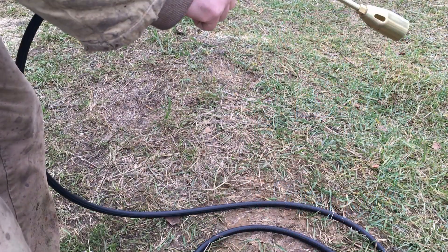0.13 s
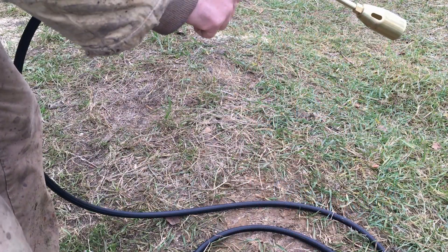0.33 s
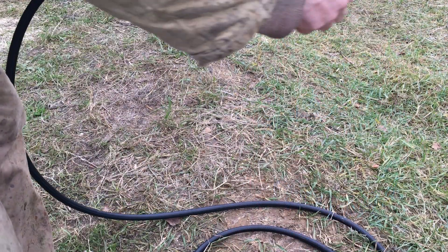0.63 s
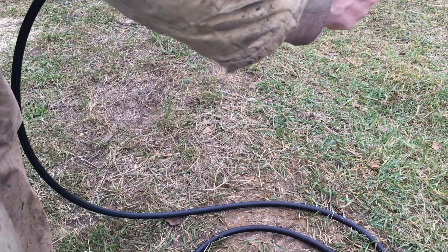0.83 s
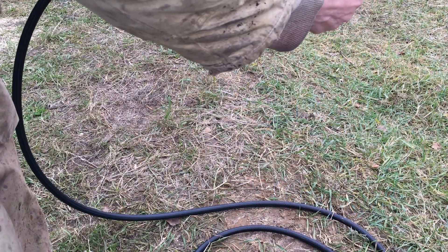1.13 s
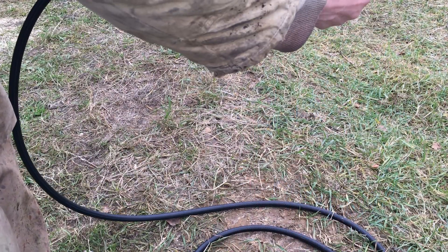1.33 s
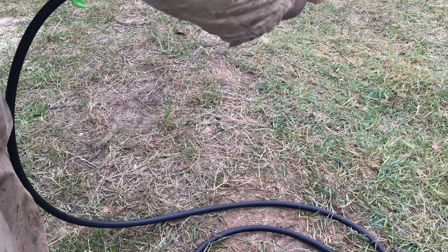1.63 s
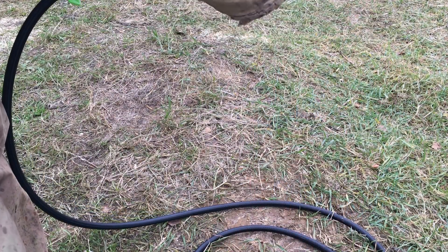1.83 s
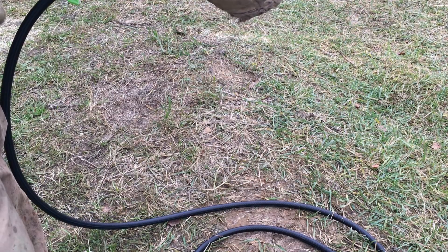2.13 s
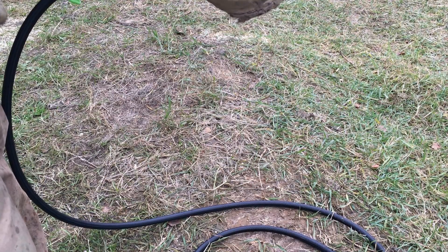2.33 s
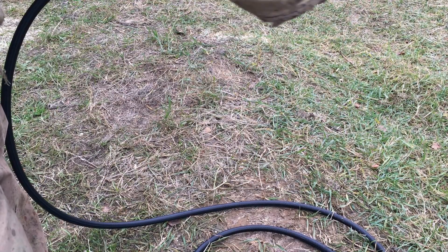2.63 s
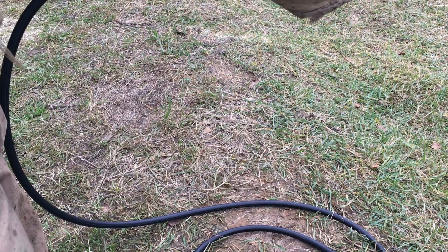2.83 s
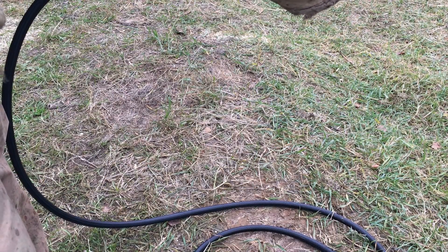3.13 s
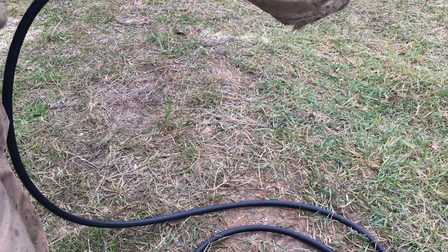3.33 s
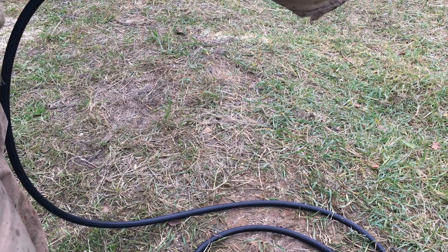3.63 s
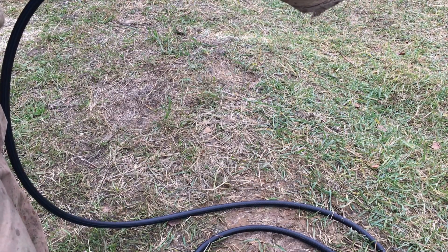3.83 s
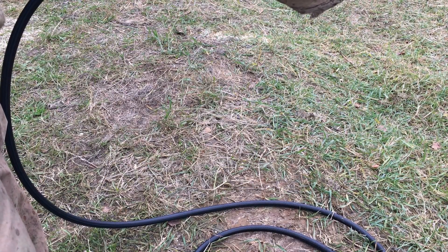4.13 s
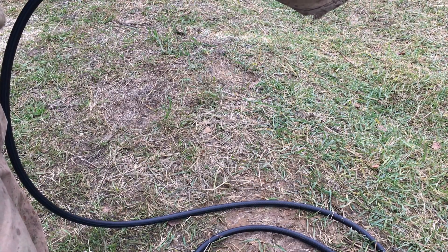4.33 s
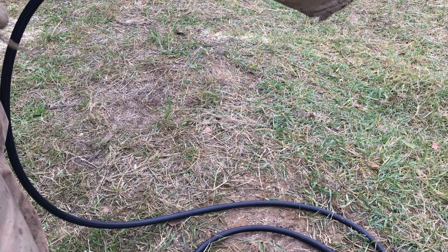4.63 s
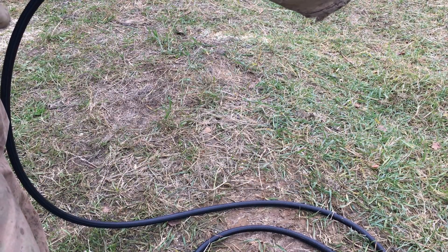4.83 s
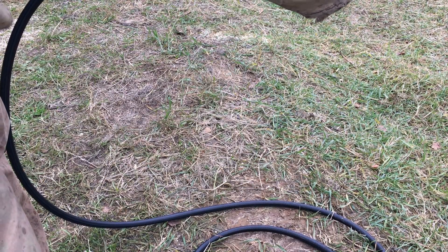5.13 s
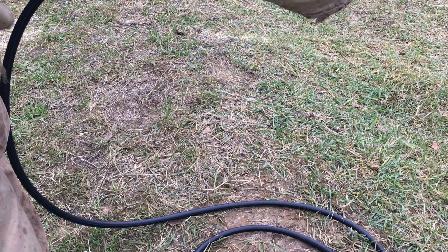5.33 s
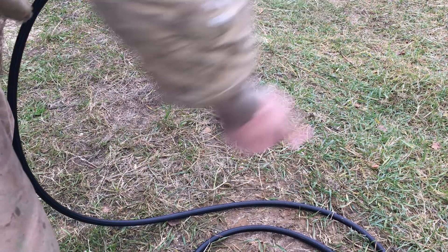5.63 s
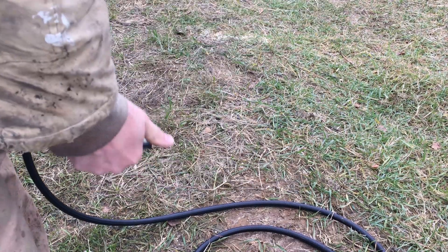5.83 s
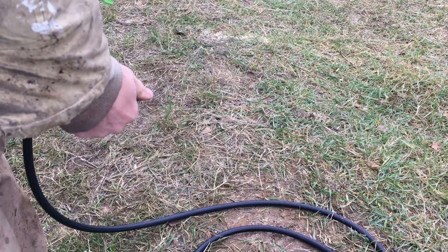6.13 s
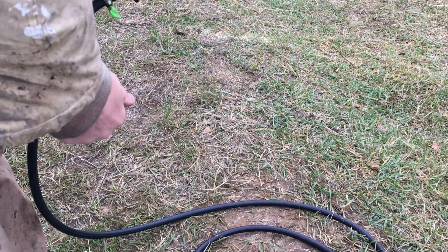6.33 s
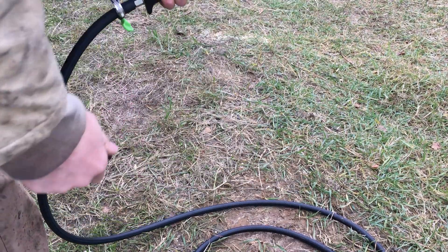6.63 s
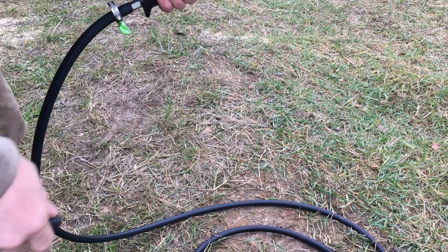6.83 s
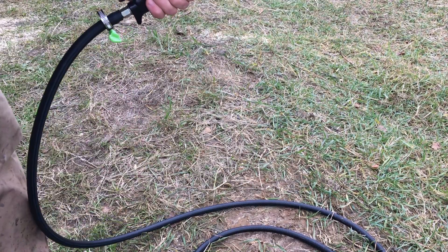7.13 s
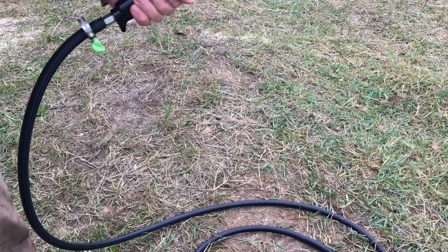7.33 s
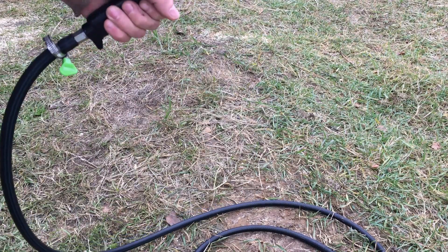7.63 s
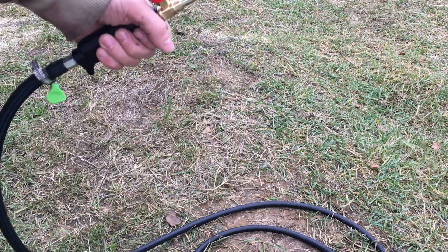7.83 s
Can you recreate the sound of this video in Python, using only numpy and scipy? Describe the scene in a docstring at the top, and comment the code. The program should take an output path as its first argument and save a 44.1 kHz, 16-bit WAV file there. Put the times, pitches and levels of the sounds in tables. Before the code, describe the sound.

Outdoors on a lawn, unlit gas hisses softly through a propane torch close to the microphone while gusts of wind rumble and bump against it. The igniter snaps sharply four times, with lighter ticks as the button springs back. On the fourth snap the gas catches with a low thump, and the flame burns with a loud, fluttering roar. Near the end a small metal fitting clinks once.

```python
"""On a lawn, a propane weed torch is lit close by.
Gas hisses through the burner tube and wind buffets the microphone while the piezo igniter snaps
four times. The fourth spark catches with a thump. The flame roars, coloured by its moving echo
off the ground, and a metal fitting clinks once."""
import sys
import numpy as np
from scipy import signal
from scipy.fft import rfft, irfft
from scipy.io import wavfile
from scipy.ndimage import uniform_filter1d, map_coordinates

SR = 44100
rng = np.random.default_rng(int(sys.argv[2]) if len(sys.argv) > 2 else 0)


def unload_audio(sound):
    """Save the sound as a 16-bit wav file, at the path given as the first command line argument."""
    columns = np.transpose(np.atleast_2d(sound))
    # keep every value between -1 and 1, then stretch to whole-number steps
    steps = np.round(np.clip(columns, -1, 1) * 32767)
    wavfile.write(sys.argv[1], SR, steps.astype(np.int16))


N = 352743
T = np.arange(N) / SR
LIGHT_S = 5.501  # the gas catches fire


# How the flame swells and sinks, before its gains: t/s, rumble level/dB, roar level/dB
FLAME_LEVELS = [(5.56, -25, -36.5), (5.67, -25, -35.5), (5.74, -24.5, -29.5), (6.38, -25, -33.5),
                (6.46, -25, -31.5), (6.79, -23.5, -35.5), (6.9, -25.5, -32), (8.0, -22.5, -31)]
# Tone colours of the flame's low rumble, middle roar and high hiss: f/Hz, level/dB
RUMBLE_COLOUR = [(20, -52), (45, -12), (70, 2), (110, 3), (170, 5), (260, 0.5), (380, -4), (500, -7.5),
                 (700, -7.5), (1050, -9), (1400, -15), (2200, -42), (5000, -38)]
ROAR_COLOUR = [(300, -13.5), (900, 1), (1400, 0.5), (2000, 1.5), (2600, 0.5), (3150, 0.5), (3450, -8),
               (4200, -8.5), (4700, -12), (5300, -18), (8000, -23.5), (16000, -34)]
HISS_COLOUR = [(2000, -9), (5000, -7.5), (6400, -1.5), (7700, -2.5), (10200, -2.5), (12000, 0), (14200, 2),
               (16000, -4)]
# Pitches at which the hot burner rings: f/Hz, width/Hz, boost/dB
BURNER_RESONANCES = [(990, 150, 0), (2810, 110, 4), (4600, 240, 7), (8700, 430, 6), (12150, 600, 3.5)]

def flame(rumble_gain_db=1.73, roar_gain_db=1.67, hiss_mean_db=-40):
    """Swirling gas burns: a rumble, a roar and a hiss that swells with it, all sharing one flutter."""
    rumble_db, roar_db = curves(FLAME_LEVELS)
    hiss_db = hiss_mean_db + 0.55 * (roar_db - np.mean(roar_db[T > LIGHT_S]))
    flutter = wander(260)
    rumble = noise(RUMBLE_COLOUR, BURNER_RESONANCES)
    rumble *= amp(rumble_db + rumble_gain_db + flutter + 0.23 * wander(30))
    rumble = band(rumble, 44, 5700, order=3)
    roar = noise(ROAR_COLOUR, BURNER_RESONANCES)
    roar *= amp(roar_db + roar_gain_db + 0.48 * flutter + 0.77 * wander(40))
    hiss = noise(HISS_COLOUR, BURNER_RESONANCES)
    hiss *= amp(hiss_db + 1.43 * flutter + 0.45 * wander(30))
    lit = np.clip((T - LIGHT_S) / 0.0036, 0, 1)
    return lit * (moving_echoes(rumble, lawn_gain=0.4) + moving_echoes(roar, lawn_gain=0.33) + hiss)


# How late the ground echo comes as the torch is lowered and raised: t/s, delay/ms
GROUND_DELAYS = [(5.6, 3.18), (6.0, 2.9), (6.6, 2.73), (7.55, 3.03), (7.8, 3.48), (8, 3.58)]

def moving_echoes(x, lawn_gain, body_gain=0.1, gain_per_ms=0.21):
    """Echoes off the lawn and the person cancel shifting pitches, more deeply as the torch is raised."""
    lawn_ms, = curves(GROUND_DELAYS)
    lawn_gain = np.clip(lawn_gain + gain_per_ms * (lawn_ms - np.mean(lawn_ms)), 0, 1)
    body_ms = 1.4 * lawn_ms + .25 * wander(2.5)
    lawn, body = (np.interp(T - ms / 1000, T, x) for ms in (lawn_ms, body_ms))
    return (x + lawn_gain * lawn + body_gain * body) / np.sqrt(1 + lawn_gain ** 2 + body_gain ** 2)


def ignition(thump_db=-17.5, swing_db=-13, swing_hz=135, width_s=0.0091):
    """The gas gathered in the tube burns at once: a thump, and a few swings of the new flame."""
    thump = np.zeros(N)
    add(thump, LIGHT_S - width_s * 1.38, amp(thump_db) * eddy(34, 307, width_s))
    age = np.maximum(T - LIGHT_S, 0)
    swing = np.sin(2 * np.pi * swing_hz * age) * bell(age / width_s - 1.4)
    return (thump + amp(swing_db) * swing) * np.minimum(age / 0.0025, 1)


# Unlit gas fading as the torch moves away, before its gains: t/s, jet level/dB, tube level/dB
GAS_LEVELS = [(0.0, -48, -55), (1.46, -48, -52.5), (1.76, -50, -56.5), (2.52, -49, -56.5),
              (2.75, -50, -58.5), (2.91, -52, -61), (5.45, -52, -62.5)]
# Tone colours of the jet and of gas rushing through the cold tube: f/Hz, level/dB
JET_COLOUR = [(300, -36), (1000, -13.5), (3000, -10.5), (5000, -12), (7200, -11.5), (9600, -2.5),
              (10400, -6.5), (12000, -3.5), (14700, 0.5), (16000, -2.5)]
TUBE_COLOUR = [(300, -31), (1300, -23.5), (1750, -10.5), (2050, -1), (2400, -6), (2650, -7.5), (3100, -22),
               (3800, -11), (4600, -23), (9000, -34)]
# Pitches at which the jet and the tube ring: f/Hz, width/Hz, boost/dB
JET_RESONANCES = [(3840, 540, 8), (5530, 290, 7), (6440, 120, 10.5), (7800, 280, 6), (9110, 280, 8.5),
                  (11130, 200, 4.5), (12500, 250, 7), (13800, 300, 4.5)]
TUBE_RESONANCES = [(2307, 120, 9.5)]

def unlit_gas(jet_gain_db=3, tube_gain_db=1):
    """The gas jet hisses and makes the burner tube ring until the flame takes over."""
    jet_db, tube_db = curves(GAS_LEVELS)
    jet = noise(JET_COLOUR, JET_RESONANCES) * amp(jet_db + jet_gain_db + 0.44 * wander(25.1))
    tube = noise(TUBE_COLOUR, TUBE_RESONANCES) * amp(tube_db + tube_gain_db)
    return (jet + tube) * (T < LIGHT_S)


def waver(x, depth_db, rate_hz, bands=24):
    """A swirling jet's tone wanders: each narrow band above the bass swells and sinks on its own."""
    f, times, spectra = signal.stft(x, SR, nperseg=1024)
    band_index = np.clip(np.log(np.maximum(f, 1) / 500) / np.log(16000 / 500), 0, 1) * (bands - 1)
    chance = rng.standard_normal((200, bands)).T
    grid = np.meshgrid(band_index, times * rate_hz, indexing="ij")
    swell = map_coordinates(chance, grid, order=1, mode="nearest")
    swell *= np.minimum(band_index / 2, 1)[:, None]  # leave the bass alone
    return signal.istft(spectra * amp(depth_db * swell), SR, nperseg=1024)[1][:N]


# Deep, brief dips in the flame's treble: t/s, depth/dB
DEEP_DIPS = [(6.003, 13), (6.09, 10), (6.174, 16), (6.495, 12), (7.285, 10), (7.454, 15), (7.668, 16),
             (7.817, 10)]

def treble_dips(x, width_s=0.0076, above_hz=3400, shallow_db=4, count=12):
    """The treble drops away for an instant: a few deep dips, and shallow ones at random times."""
    depth_db = np.zeros(N)
    t = np.arange(SR // 10) / SR
    shallow = [(t[-1] + when * (T[-1] - t[-1]), shallow_db * (.5 + size))
               for when, size in rng.random((count, 2))]
    for s, db in list(DEEP_DIPS) + shallow:
        add(depth_db, s - t.mean(), db * bell((t - t.mean()) / width_s))
    low = signal.sosfiltfilt(signal.butter(3, above_hz, fs=SR, output="sos"), x)
    return low + (x - low) * amp(-depth_db)


# The igniter's hammer strikes: t/s, level/dB, brightness/(dB per octave)
HAMMER_SNAPS = [(2.3418, -16, 0), (3.2006, -16.5, -0.5), (4.096, -16.5, -1.5), (5.493, -17.5, -3)]
# Its button springs back: t/s, level/dB
BUTTON_RELEASES = [(2.5303, -25.5), (3.3925, -32.5), (4.715, -33)]
# Tone colours of those two clicks: f/Hz, level/dB
SNAP_COLOUR = [(300, -35), (1000, -36), (1500, -18.5), (2200, -2), (2850, -.5), (3500, -20.5), (3900, -19),
               (4500, -9), (6600, -1.5), (7900, -14.5), (9500, -8), (10500, -11.5), (15500, -8.5)]
RELEASE_COLOUR = [(300, -27), (1000, -25), (2200, -9.5), (4200, -9), (6000, -5.5), (6800, 1), (7700, -11),
                  (10500, -13), (14200, -3), (16000, -11)]

def igniter():
    """Each press snaps a spring hammer onto the piezo crystal; the button returns with a lighter tick."""
    out = np.zeros(N)
    for s, db, brightness in HAMMER_SNAPS:
        tone = [(hz, level + brightness * np.log2(hz / 4000)) for hz, level in SNAP_COLOUR]
        add(out, s, amp(db) * click(tone, spread_s=0.00235, yard_db=-13.5, yard_s=0.024))
    for s, db in BUTTON_RELEASES:
        add(out, s, amp(db) * click(RELEASE_COLOUR, spread_s=0.0029, yard_db=-11, yard_s=0.019))
    return out


# A click's echoes from the ground, the person and the yard: delay/s, level/dB
CLICK_ECHOES = [(.0032, -8.5), (0.0138, -22.5), (0.0173, -20), (.035, -42), (.052, -31), (.059, -32),
                (.071, -30)]
# Pitches at which the igniter's casing rings: f/Hz, width/Hz, boost/dB
CASING_RESONANCES = [(2620, 230, 1.5), (5400, 400, 0.5), (7050, 400, 5), (8450, 310, 6), (9100, 300, 9),
                     (9900, 400, 9), (11400, 500, 6.5), (12450, 600, 8.5), (14700, 700, 2.5)]

def click(tone, spread_s, yard_db, yard_s):
    """A crack in the igniter's casing, its echoes, then faint scatter from the yard."""
    t = np.arange(SR // 5) / SR
    f = np.fft.rfftfreq(len(t), 1 / SR)
    # the blow holds all pitches evenly, but each leaves the casing after its own short delay
    delay = spread_s * (0.149 + np.interp(f, np.linspace(0, SR / 2, 22), rng.random(22) ** 2))
    crack = irfft(np.exp(-2j * np.pi * np.cumsum(delay) * f[1]), len(t)) * np.sqrt(.005 * SR)
    echoes = sum(amp(db) * np.roll(crack, int(lag * SR)) for lag, db in CLICK_ECHOES)
    scatter = rng.standard_normal(len(t)) * np.exp(-t / yard_s) * amp(yard_db)
    fade = np.minimum(10 * (1 - t / t[-1]), 1) ** 2
    return colour((crack + echoes + scatter) * fade, tone, CASING_RESONANCES)


# The metal fitting's ringing tones: f/Hz, level/dB, time to fade by 60 dB/s
FITTING_TONES = [(3688, -33, .2), (5909, -15.5, .17), (6033, -32, .15), (10710, -33, .11),
                 (11750, -34, .11)]

def clink(start_s=7.5156, tick_db=-13):
    """A hard knock sets a small metal fitting ringing."""
    t, out = np.arange(SR // 3) / SR, np.zeros(N)
    ring = sum(amp(db - 60 * t / fade_s) * np.sin(2 * np.pi * hz * t) for hz, db, fade_s in FITTING_TONES)
    tick = band(rng.standard_normal(len(t)), 4500, 14000) * np.exp(-t / 0.0019)
    add(out, start_s, ring + amp(tick_db) * tick)
    return out


def whistle(peak_s=7.06, hz=5260, width_hz=130, width_s=.025, level_db=-42):
    """A faint, brief whistle rises out of the roar."""
    tone = unit(band(rng.standard_normal(N), hz - width_hz / 2, hz + width_hz / 2))
    return tone * amp(level_db) * bell((T - peak_s) / width_s)


# Gusts of wind: t/s, length/s, strength/dB
WIND_GUSTS = [(0.0, 0.23, -43.5), (.36, 1.33, -33), (1.555, 0.055, -23.5), (1.66, 0.28, -33.5),
              (2.102, .1, -40.5), (2.41, 0.02, -41), (2.81, 0.258, -44), (3.104, 0.084, -35),
              (3.318, 0.27, -39), (3.433, 0.0744, -32), (3.752, 0.14, -32.5), (4.048, 0.05, -40.5),
              (4.206, 0.3, -32.5), (4.84, 0.042, -46)]

def wind(gain_db=-0.87, rise_db_per_s=334, fall_db_per_s=178, calm_db=-67):
    """Gusts rumble on the microphone until the torch lights; fine swirls grow faster than the rumble."""
    gusts = [db - rise_db_per_s * np.maximum(s - T, 0) - fall_db_per_s * np.maximum(T - s - length, 0)
             for s, length, db in WIND_GUSTS]
    strength_db = np.maximum(np.max(gusts, axis=0), calm_db)
    rumble = noise([(25, -27.5), (38, -2.5), (60, 1.5), (100, -2.5), (160, -9.5), (260, -28.5),
                    (450, -45.5), (1000, -65)])
    rumble = band(rumble, 33, 1040)
    rumble /= np.sqrt(uniform_filter1d(rumble ** 2, SR // 10))  # even out its slow swells
    swirls = noise([(60, -14.5), (130, 2.5), (220, -2.5), (350, -13.5), (600, -24), (1200, -55)])
    swirls *= amp(-14 + 0.32 * (strength_db + 31.5) + 3.3 * wander(60))
    rumble *= amp(3.5 * wander(35))
    return (rumble + swirls) * amp(strength_db + gain_db) * (T < LIGHT_S) + buffets(strength_db)


# The hardest bumps of wind, before gain and stretch: t/s, level/dB, top f/Hz, width/s
HARD_BUFFETS = [(0.391, -20.5, 310, 0.0039), (0.42, -27.5, 190, 0.0072), (0.555, -26.5, 195, .012),
                (0.715, -31, 186, .006), (0.802, -27.5, 173, .007), (0.848, -25, 223, 0.0088),
                (1.002, -23, 205, 0.0047), (1.124, -30.5, 185, 0.0062), (1.22, -26, 232, .015),
                (1.48, -32, 200, .006), (1.599, -23.5, 167, 0.015), (1.685, -32, 240, .012),
                (1.75, -30.5, 260, .008), (1.825, -32.5, 208, .007), (1.962, -27, 201, 0.0049),
                (2.114, -34.5, 180, 0.0071), (3.13, -30.5, 214, .005), (3.18, -26.5, 157, 0.0048),
                (3.34, -34, 165, .006), (3.76, -32, 180, 0.00603), (3.862, -31, 220, .013),
                (3.908, -33, 200, .006), (4.295, -26, 276, 0.0049), (4.343, -29.5, 230, 0.0076),
                (4.4, -25, 179, 0.0074), (4.465, -25, 280, .003)]

def buffets(strength_db, gain_db=0.5, pitch_stretch=1.175, small_width_s=0.00598, count=60):
    """Hard bumps of air, and small random swirls that are louder and reach higher in stronger wind."""
    out, small = np.zeros(N), []
    for k, (when, size) in enumerate(rng.random((count, 2))):
        s = (k + when) / count * LIGHT_S
        db = strength_db[int(s * SR)] - 3.5 + size
        hz = 160 * 2 ** (.02 * (db + 36))
        small.append((s, db, hz, small_width_s))
    for s, db, hz, width_s in small + list(HARD_BUFFETS):
        add(out, max(s - 3 * width_s, 0), amp(db + gain_db) * eddy(55, pitch_stretch * hz, width_s))
    return out


def eddy(low_hz, high_hz, width_s):
    """One short swirl of air: a puff of low noise that peaks 3 widths after it starts."""
    t = np.arange(int(6 * width_s * SR)) / SR
    swirl = band(rng.standard_normal(SR // 4), low_hz, high_hz)
    swirl = band(swirl, 25, 2 * high_hz, order=4)[-len(t):]  # the smallest swirls die out steeply
    swirl *= bell(t / width_s - 3) - bell(3)
    return unit(swirl) * np.sqrt(.5)


# Tone colour of the outdoor background: f/Hz, level/dB
AIR_COLOUR = [(20, -9), (70, 1), (150, -12.5), (300, -13.5), (600, -20.5), (1200, -24), (4000, -34.5)]

def outdoor_air(level_db=-59):
    """A quiet, low hush that slowly swells and sinks."""
    return noise(AIR_COLOUR) * amp(level_db + 2.1 * wander(3.4))


def amp(db):
    """Turn decibels into a gain."""
    return 10 ** (np.asarray(db) / 20)


def unit(x):
    """Scale to an average power of 1."""
    return x / np.sqrt(np.mean(x ** 2))


def bell(x):
    """A smooth hump of height 1 at x = 0."""
    return np.exp(-.5 * x ** 2)


def curves(table):
    """Join a table's values with straight lines in time."""
    times, *columns = np.transpose(table)
    return [np.interp(T, times, column) for column in columns]


def add(out, start_s, sound):
    """Mix a sound in at a given time."""
    i = int(start_s * SR)
    out[i:i + len(sound)] += sound[:N - i]


def wander(rate_hz):
    """A smooth random curve of size near 1 that changes about rate_hz times a second."""
    hold = max(int(SR / rate_hz), 1)
    steps = np.repeat(rng.standard_normal(N // hold + 1), hold)
    return unit(uniform_filter1d(uniform_filter1d(steps, hold), hold)[:N])


def colour(x, tone, resonances=(), size=8192):
    """Shape a sound with (f/Hz, level/dB) points and ringing peaks; white noise keeps its power."""
    f = np.maximum(np.fft.rfftfreq(size, 1 / SR), 1)
    hz, db = np.transpose(tone)
    peaks_db = sum(boost / (1 + (2 * (f - centre) / width) ** 2) for centre, width, boost in resonances)
    cepstrum = irfft(np.log(amp(np.interp(np.log(f), np.log(hz), db) + peaks_db)))
    # fold it so that the filter rings only after a sound, never before
    cepstrum[1:size // 2] *= 2
    cepstrum[size // 2 + 1:] = 0
    response = irfft(np.exp(rfft(cepstrum)))[:size // 2]
    return signal.fftconvolve(x, response / np.linalg.norm(response))[:len(x)]


def noise(tone, resonances=()):
    """Noise with a given tone colour and a power of 1."""
    return unit(colour(rng.standard_normal(N), tone, resonances))


def band(x, low_hz, high_hz, order=2):
    """Keep the pitches between two limits."""
    return signal.sosfilt(signal.butter(order, sorted([low_hz, high_hz]), "band", fs=SR, output="sos"), x)


def scene():
    """Torch, igniter and wind over a quiet yard, in one channel."""
    air = outdoor_air()
    torch = waver(unlit_gas(), depth_db=1.14, rate_hz=3.01)
    torch += waver(flame(), depth_db=2.4, rate_hz=7, bands=56)
    return (treble_dips(torch) + igniter() + ignition() + clink() + whistle() + wind() + air)[None]


def record(dry):
    """Cut the very highest treble, above 15750 Hz."""
    return signal.sosfilt(signal.ellip(10, .2, 80, 15750, fs=SR, output="sos"), dry)


dry = scene()
out = record(dry)
unload_audio(out)
```